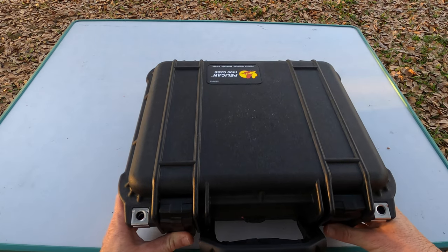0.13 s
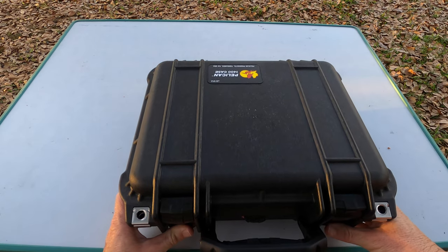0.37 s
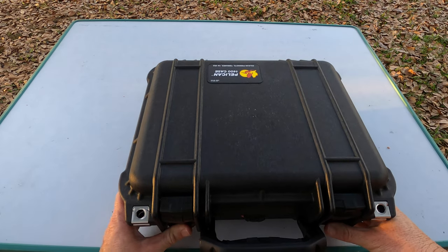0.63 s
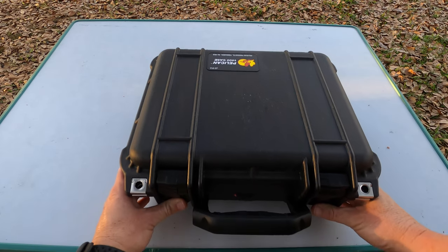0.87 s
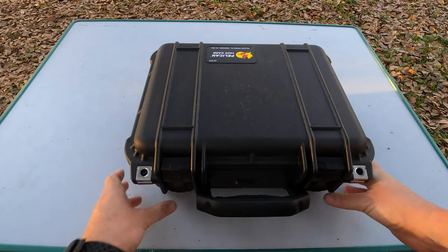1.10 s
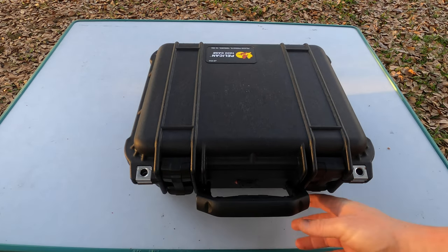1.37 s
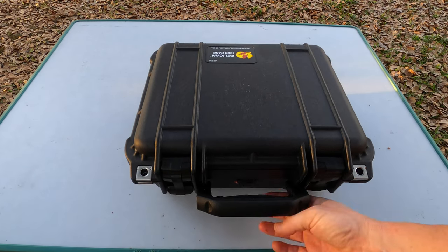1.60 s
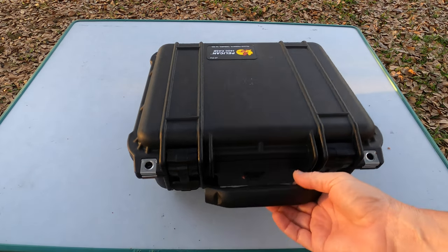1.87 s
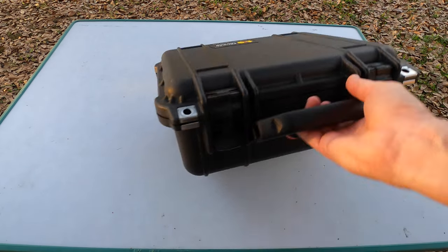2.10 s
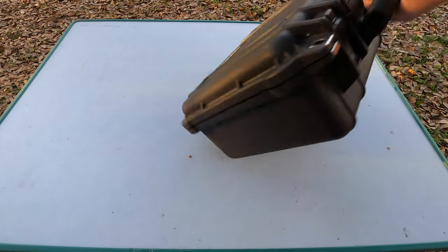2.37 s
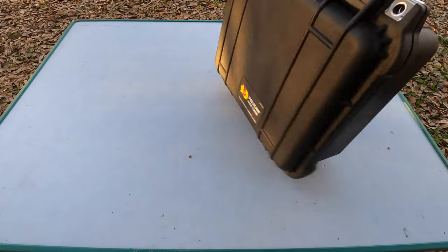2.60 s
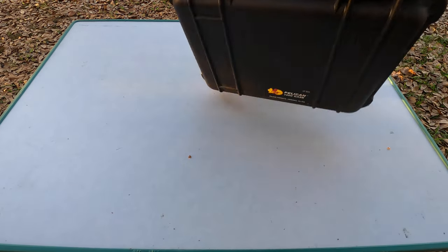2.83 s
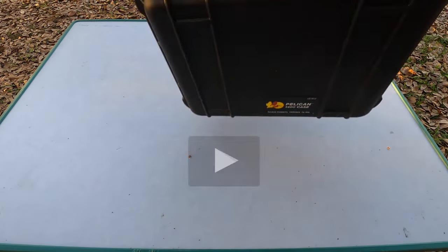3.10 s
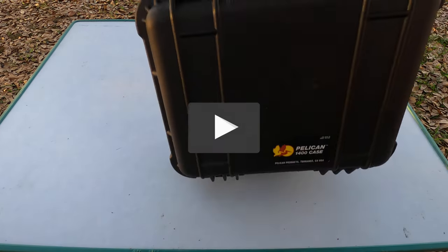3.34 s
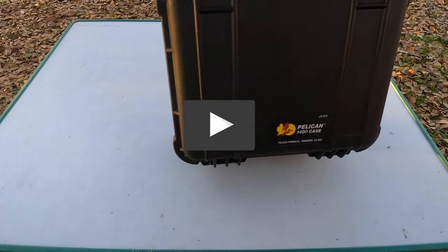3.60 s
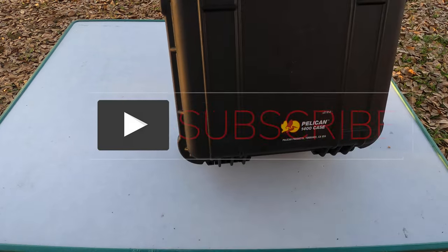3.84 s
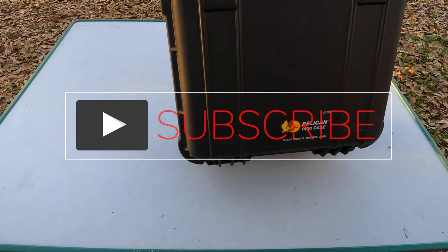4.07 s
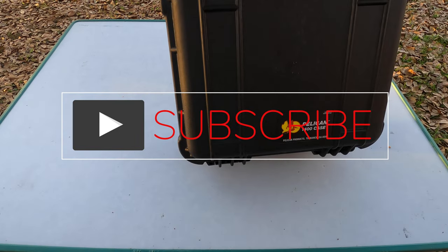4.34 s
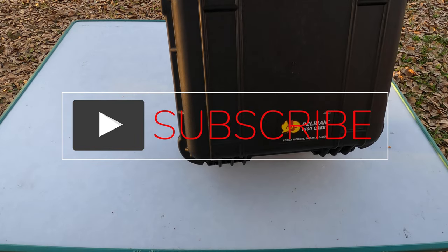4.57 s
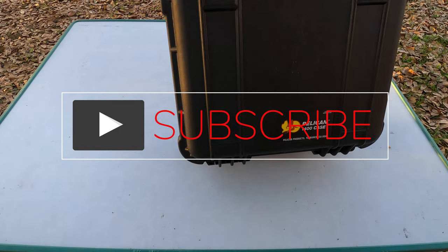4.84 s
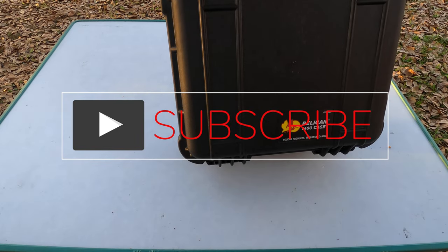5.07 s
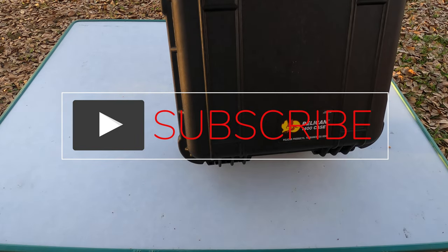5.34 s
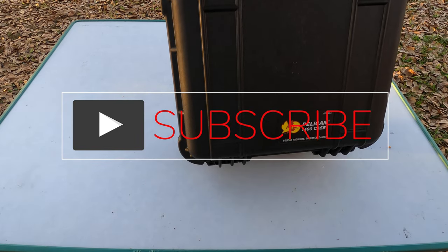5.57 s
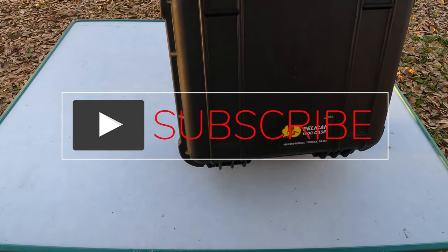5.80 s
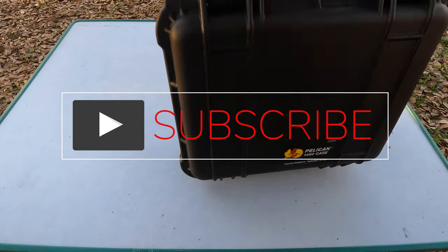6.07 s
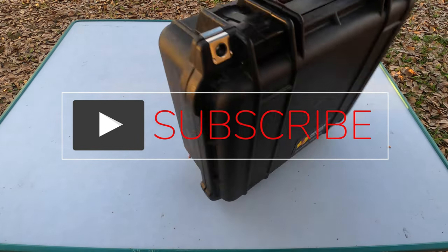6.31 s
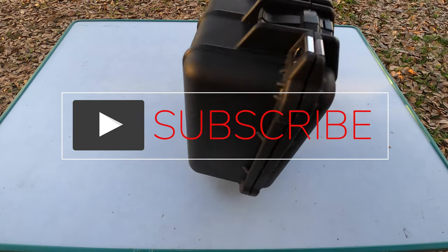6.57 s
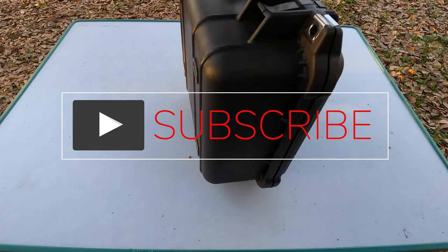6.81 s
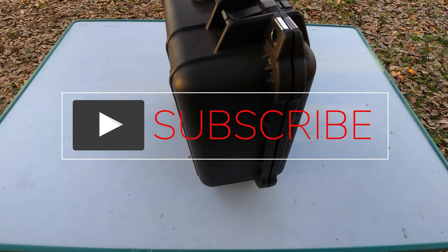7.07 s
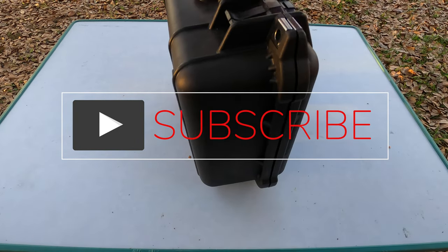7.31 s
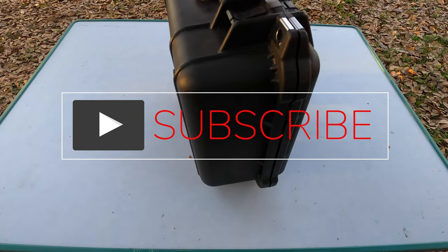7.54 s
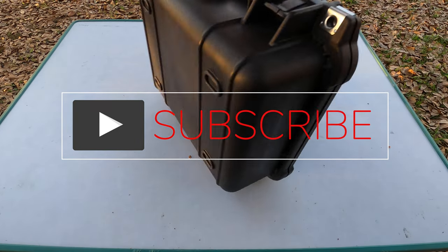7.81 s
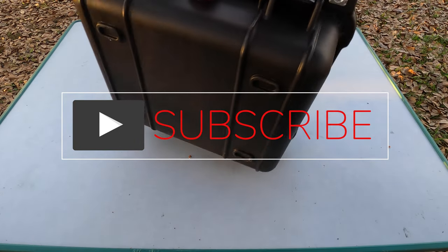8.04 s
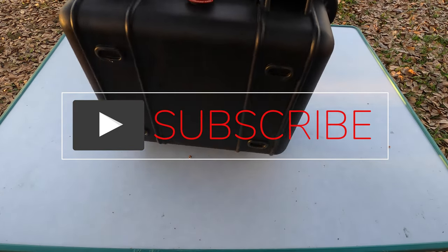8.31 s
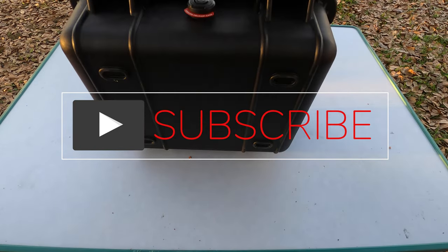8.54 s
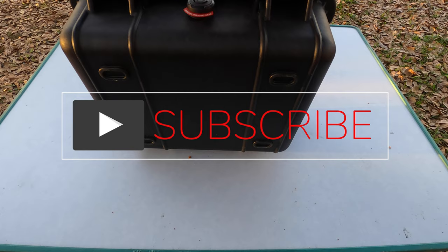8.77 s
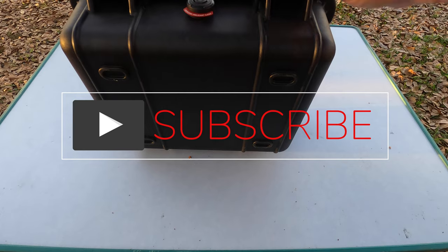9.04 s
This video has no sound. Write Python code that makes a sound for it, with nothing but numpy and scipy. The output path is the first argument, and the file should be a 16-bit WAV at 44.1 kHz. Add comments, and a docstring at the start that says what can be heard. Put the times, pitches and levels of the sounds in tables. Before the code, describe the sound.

Close stereo pickup outdoors. A steady low traffic hum with a wavering drone runs throughout, swelling gently near 2.5 and 6.5 seconds. Faint high cricket chirps recur from 1.2 seconds, several each second, stronger on the left, over a thin trill; tiny bird whistles appear occasionally. At 0.4 a latch ratchets briefly and snaps loudly with a small boom. A skin-on-plastic rub fills 0.8 to 1.2, ending with a light handle tap; a sharper clack comes at 1.55. Handle clacks and a knock follow around 2.35, a strong hollow knock at 2.77, then a cluster from 3.46 to 3.95. From 4 to 6.2 only the background remains. Short rubs and bumps resume, with a knock at 6.33 and duller thuds from 6.9 to 7.25. Brief bright scrapes near 7.8 to 8 lead to final knocks at 8.35 to 8.7, then softer low bumps until about 9.1.

```python
"""Plastic case on a folding table

A hard case is set down, slid, lifted and turned outdoors: contacts excite damped modes of shell and table.
A latch ratchets and snaps, a handle taps the shell (struck modes); hands and feet rub (filtered noise).
Behind: far traffic (coloured noise and a drone), crickets (pulsed tone, ringing noise),
small birds (gliding sines with diffuse echoes).
"""
import sys
import numpy as np
from scipy import signal
from scipy.fft import rfft, irfft, next_fast_len
from scipy.io import wavfile
from scipy.ndimage import uniform_filter1d

SR = 44100
rng = np.random.default_rng(int(sys.argv[2]) if len(sys.argv) > 2 else 0)


def invert_db(x):
    """Field ratio 10**(x/20) for x, a level in decibels (scalar or array-like)."""
    u = np.asarray(x, float) / 20
    return 10 ** u


def unload_audio(sound):
    """Save the sound as a 16-bit wav file, at the path given as the first command line argument."""
    columns = np.transpose(np.atleast_2d(sound))
    # keep every value between -1 and 1, then stretch to whole-number steps
    steps = np.round(np.clip(columns, -1, 1) * 32767)
    wavfile.write(sys.argv[1], SR, steps.astype(np.int16))


N = 403956

# far traffic spectrum before the hum: f/Hz, density/dB per Hz
FAR_COLOUR = [(12, -38), (20, -13.5), (58, -6), (145, -2), (222, -14), (299, -19), (351, -23), (496, -34),
              (871, -25.5), (1080, -28.5), (3900, -57), (6840, -54), (8940, -62.5), (9690, -84.5),
              (12000, -92), (15600, -119), (22000, -120)]
# hum resonances: f/Hz, width/Hz, lift/dB
HUM_RESONANCES = [(55, 10, 6.5), (136.84, 15, 9.5), (176, 5.4, 6.5), (220.9, 35, 8), (362, 20, 11.5)]
# left-right likeness of the traffic: f/Hz, likeness/1 (negative counts as 0)
FAR_LIKENESS = [(60, 1), (180, 1), (550, 0.92), (1650, 0.68), (4970, 0.14), (15000, -0.11)]
# traffic, left over right: f/Hz, level/dB
FAR_LEFT_RIGHT = [(60, 2), (180, 1), (550, 4), (1650, 3), (4970, 3), (15000, -2)]
# traffic, lag of the left port: f/Hz, phase/rad
FAR_LEFT_LAG = [(50, .05), (700, 0.39), (2150, 1.1), (4500, 1.1), (9000, 3.5)]
# overall background level: t/s, level/dB
BACKGROUND_LEVEL = [(0, -5.5), (.8, -7.5), (1.5, 0), (2.1, 2.5), (2.5, 5), (2.9, -0.5), (3.2, 0.5),
                    (3.8, -1.5), (4.2, -1.5), (4.64, 0.5), (5.1, 0), (5.5, 0.5), (5.87, 2), (6.45, 2.5),
                    (6.8, 1), (7.3, 1), (8.3, -0.5), (9.16, 0.5)]
# traffic registers: from f/Hz, to f/Hz, level/dB, share of the background level/1
TRAFFIC_REGISTERS = [(0, 95, -40, 1.1), (102.6, 420, -39, 0.71), (415, 22050, -54.5, 1.1)]
# cricket chirps: start t/s, first to last pulse/s, level/dB
CRICKET_CHIRPS = [(1.229, 0, -62), (1.452, .05, -64), (1.739, .05, -63.5), (2.004, .05, -59),
                  (2.594, 0, -56), (2.816, .05, -60), (3.078, .05, -61), (3.341, .05, -58),
                  (3.682, 0, -60.5), (3.948, .05, -61.5), (4.226, .05, -58), (4.486, .1, -58),
                  (4.856, .05, -60.5), (5.148, .05, -58), (5.45, .05, -56), (5.747, .05, -56.5),
                  (6.048, .05, -57), (6.368, .05, -61), (6.646, .05, -58.5), (6.971, 0, -56.5),
                  (7.21, .05, -60), (7.492, .05, -59), (7.78, .05, -58), (8.081, .1, -55.5)]
# cricket trill: t/s, level/dB
TRILL_LEVEL = [(0, -82), (1.2, -79), (4, -81.5), (6.3, -77.5), (7.2, -79), (9.16, -90.5)]
# arched bird calls: start t/s, length/s, top f/Hz, level/dB
ARCHED_CALLS = [(1.39, .1, 8240, -70), (5.05, .1, 8140, -72), (6.545, .09, 8360, -68),
                (7.12, .09, 8270, -77), (7.26, .1, 8000, -72), (7.59, .125, 8200, -71),
                (8.07, .2, 8950, -79), (8.15, .125, 8200, -69), (8.335, .11, 8180, -70),
                (8.86, .08, 8140, -73)]
# arched call shape: share of length/1, f over top f/1, level/dB
ARCH_SHAPE = [(0, .95, -9), (.3, 1, -2), (.45, .985, -1), (.75, .92, 0), (1, .89, -6)]
# falling bird notes: start t/s, length/s, first f/Hz, level/dB
FALLING_CALLS = [(1.842, .035, 4700, -62), (7.712, .04, 4600, -64)]
# falling note shape: share of length/1, f over first f/1, level/dB
FALL_SHAPE = [(0, 1, -4), (.4, .93, 0), (1, .8, -8)]
# hand and foot slides: start t/s, length/s, rub level/dB, drag over rub/dB, sizzle over rub/dB
RUB_SLIDES = [(-.1, 0.28, -64.5, -6, -7.5), (.405, 0.3, -63.5, -3.5, -5.5), (0.727, 0.069, -73, -2, -15),
              (0.79, 0.39, -40, -11.5, -22.5), (1.162, 0.013, -52, -5, -28), (1.19, .12, -78, -10, -8),
              (1.557, 0.088, -58.5, 0, -14), (1.74, 0.2, -68, -14, -4), (1.929, 0.053, -52, -3, -27),
              (2.09, 0.72, -52.5, -4, -9.5), (2.32, .26, -71, -2, -4), (2.632, 0.22, -58, 6, -9.5),
              (3.236, 0.24, -73, -7, -3), (3.458, 0.11, -61, -5, -10), (3.596, 0.05, -60.5, -0.5, -34),
              (3.714, 0.11, -64, 6.5, -22), (6.182, 0.025, -63.5, -18, -2.5),
              (6.237, .035, -60.5, 7.5, -12), (6.333, 0.027, -63, 14.5, -5),
              (6.437, 0.04, -52.5, -1.5, -15.5), (6.53, 0.031, -56.5, -0.5, -17),
              (6.606, 0.04, -55.5, 2, -13), (6.674, 0.058, -55.5, 0.5, -4.5),
              (6.738, 0.089, -51.5, -1.5, -21), (6.909, 0.067, -55.5, 4.5, -17),
              (7.503, 0.066, -66.5, 9.5, -4.5), (7.617, .12, -72.5, -5, -5), (7.778, 0.075, -52, 0, -1),
              (7.87, 0.077, -56, 6, -8), (7.957, 0.068, -52.5, 1.5, 0), (8.333, 0.13, -60, 1.5, -19.5),
              (8.42, .15, -52, 0.5, -19), (8.607, 0.062, -74, 7, -9.5)]
# loss at both ends of a full slide, where it is slowest: drag/dB, rub/dB, sizzle/dB
END_LOSS_DB = [8, 12, 15]
# low drag spectrum: f/Hz, density/dB per Hz
DRAG_COLOUR = [(500, -33), (900, 3), (1400, 8.5), (2000, 0), (3000, -44)]
# shell rub spectrum: f/Hz, density/dB per Hz
RUB_COLOUR = [(1200, -41.5), (2000, -4), (2420, -6), (2900, 1.5), (3850, -3.5), (4500, -8.5), (6500, -16.5),
              (9000, -24.5), (12000, -47.5)]
# bright sizzle spectrum: f/Hz, density/dB per Hz
SIZZLE_COLOUR = [(3500, -24), (5000, 1.5), (6500, -1.5), (8300, -8.5), (11000, -14), (13000, -22.5),
                 (16000, -50)]
# shell bands that sing under a rub: f/Hz, level/dB, t60/s
SINGING_BANDS = [(934, -17.5, 0.086), (1530, -18.5, .03), (2387, -9.5, 0.018), (2930, -16.5, 0.032),
                 (3900, -16, 0.0061), (5000, -21, 0.015)]
# latch modes: f/Hz, level/dB, t60/s
LATCH_MODES = [(620, -17, .02), (950, -10.5, .014), (1350, -3.5, 0.0072), (1920, -1, .007),
               (2500, -4.5, 0.0045), (3400, -4, 0.0039), (4700, -6.5, 0.0039), (6600, -12.5, .004),
               (9200, -14.5, .004), (12500, -23.5, .003)]
# boom of the closed lid: f/Hz, level/dB, t60/s
LID_MODES = [(143, -15, .13), (191, -21.5, 0.35), (262, -20, .13), (410, -22, .06)]
# folding handle on the shell: t/s, level/dB
TAPS = [(1.1679, -27.5), (1.5445, -39), (1.5548, -15), (2.3642, -10.5), (2.4088, -26), (2.4242, -35)]
# handle modes: f/Hz, level/dB, t60/s
HANDLE_MODES = [(957, 2.5, 0.023), (1370, -1, 0.014), (1660, 0, 0.012), (2180, -0.5, 0.01),
                (2860, -11.5, 0.0098), (3700, -5, 0.0079), (5100, -25, .008), (6640, -25, 0.01),
                (9280, -22, 0.0038)]
# contacts: t/s, push on table/dB, knock on shell/dB, hardness/dB per octave above shell pitch
CONTACTS = [(1.1542, -48.5, -37, -7), (1.6173, -51, -47.5, -6), (1.9563, -36.5, -60, 8.5),
            (2.128, -38, -33, -1), (2.335, -17.5, -25.5, -8.5), (2.4246, -32.5, -49, -5),
            (2.4671, -31.5, -32.5, -7.5), (2.7035, -30, -36, -7), (2.7348, -22, -33, -8),
            (2.771, -10, -18.5, -2), (3.46, -37.5, -38.5, -10), (3.471, -10, -17, -4.5),
            (3.5222, -28.5, -45.5, 2), (3.5971, -14, -19, -10.5), (3.6768, -26.5, -33.5, -12),
            (3.7241, -18.5, -24, -10), (3.797, -24, -26, -5.5), (3.9553, -34.5, -43.5, -13),
            (6.1882, -51, -60, 6.5), (6.3265, -20.5, -20.5, -6.5), (6.4404, -23, -46.5, 6),
            (6.516, -33.5, -35.5, -8), (6.6018, -49.5, -52, 1), (6.6731, -48.5, -52, 0),
            (6.7623, -54, -50, 5), (6.9179, -14, -17.5, -11.5), (6.989, -16.5, -25, -8),
            (7.1172, -18, -18.5, -14), (7.228, -25, -28, -32), (7.268, -47, -51, -16),
            (7.2896, -34.5, -44.5, -24), (7.352, -68, -49.5, -12.5), (7.4062, -58, -46.5, -11),
            (7.4391, -37, -44, -18), (7.488, -58, -48, -5), (7.7806, -28.5, -44, -11),
            (8.354, -19, -43, -2.5), (8.4697, -14, -18, -4), (8.4907, -39, -30.5, -14),
            (8.5108, -43.5, -42, 2.5), (8.5734, -45.5, -49.5, 1.5), (8.6272, -20, -24, -16.5),
            (8.6953, -24, -34.5, -20.5), (8.7231, -53, -49.5, -6.5), (8.873, -28.5, -41, -23),
            (8.888, -48, -47, -2), (8.9617, -36.5, -41, -34), (9.0942, -31, -50, -12)]
# case and table-top modes: f/Hz, level/dB, t60/s
BODY_MODES = [(39.3, -8, 0.16), (63.4, -7.5, 0.28), (81, -4.5, 0.084), (111.8, 4.5, 0.13), (138.8, 0, 0.2),
              (172, 2.5, 0.15), (206.3, -5.5, 0.25), (259, -8, 0.16), (331.4, -6, 0.14),
              (397.6, -7.5, 0.14), (474.4, -6.5, 0.083), (629, -6.5, 0.061), (758, -7, 0.042),
              (960, 1.5, 0.024), (1123, 4, 0.02), (1285, 0, 0.023), (1477, 5, 0.013), (1732, 3.5, 0.012),
              (2007, 4, 0.0091), (2630, 3.5, 0.0065), (3230, -1.5, 0.011), (3810, -2.5, 0.0023),
              (4620, 1, 0.0061), (6150, -4, 0.0063), (7670, -8.5, 0.0008), (8900, -7, 0.004),
              (11350, -18.5, 0.0017), (14970, -15.5, 0.0017)]
# case, lag of the left port: f/Hz, phase/rad
NEAR_LEFT_LAG = [(50, .17), (200, .2), (350, .27), (700, .44), (1400, .57), (2800, .76), (5500, 1.1),
                 (9000, 1.45), (15000, 2.3)]
# case, left over right: f/Hz, level/dB
NEAR_LEFT_RIGHT = [(60, .7), (180, .7), (350, -.2), (700, -.4), (1400, -.9), (2800, 1.1), (5500, -.3),
                   (10000, -2.5), (14000, -.5)]


def rms_one(x):
    """Scale to unit rms."""
    return x / np.sqrt(np.mean(x ** 2) + 1e-20)


def at_hz(points, hz):
    """Read a (f/Hz, value) table on a log axis."""
    points = np.array(points)
    return np.interp(np.log(hz + 1), np.log(points[:, 0]), points[:, 1])


def drift(rate_hz):
    """Random wander of unit rms: noise through two equal poles at rate_hz."""
    step = 40  # samples per drawn point
    r = np.exp(-2 * np.pi * step * rate_hz / SR)
    noise = rng.standard_normal(N // step + 2002)
    slow = signal.lfilter([1], [1, -2 * r, r * r], noise)[2000:]  # settled part
    return np.interp(np.arange(N) / step, np.arange(len(slow)), rms_one(slow))


def ring(x, hz, t60_s, soft=0.):
    """Damped resonator: a unit click starts a wave of height 1; soft rounds the start."""
    r, w = invert_db(-60 / (t60_s * SR)), 2 * np.pi * hz / SR
    poles = np.convolve([1, -2 * r * np.cos(w), r * r], [1, -2 * soft, soft ** 2])
    return signal.lfilter(np.array([.5, 0, -.5]) * (1 - soft) ** 2, poles, x + 1e-18)


def decaying(clicks, fade_s):
    """Each click starts an exponential decay to 1/e in fade_s."""
    return signal.lfilter([1], [1, -np.exp(-1 / (SR * fade_s))], clicks + 1e-18)


def shaped(x, gain):
    """Filter by a gain given as a function of f/Hz."""
    size = next_fast_len(N)
    hz = np.arange(size // 2 + 1) * SR / size
    return irfft(rfft(x, size) * gain(hz), size)[..., :N]


def ports(lag, balance):
    """Two microphone ports: sound reaches the right one first; levels differ with frequency."""
    def gain(hz):
        level = invert_db(np.outer([.5, -.5], at_hz(balance, hz)))
        return level * np.exp(-.5j * np.outer([1, -1], at_hz(lag, hz)))
    return gain


def scatter(x, t60_s=.25):
    """Diffuse echoes off ground and trees: decaying noise, unlike in the two ports."""
    t = np.arange(SR // 3) / SR
    echoes = rng.standard_normal((2, len(t))) * invert_db(-60 * t / t60_s) * (t > .01)
    return signal.fftconvolve(x[None], echoes / np.sqrt(np.sum(echoes ** 2) / 2), axes=1)[:, :N]


def traffic(patchy_db=1.5, drone_hz=138.1, drone_db=-39.5, top_hz=9000):
    """Far traffic: noise registers follow the overall background level together with a wavering drone; treble
    differs between ports."""
    size = next_fast_len(N)
    hz = np.arange(size // 2 + 1) * SR / size
    hum_db = sum(db / (1 + (2 * (hz - centre) / width) ** 2) for centre, width, db in HUM_RESONANCES)
    roll_off_db = 20 * np.log10(1 + (hz / top_hz) ** 24)
    colour = invert_db(at_hz(FAR_COLOUR, hz) + hum_db - roll_off_db) * ports(FAR_LEFT_LAG, FAR_LEFT_RIGHT)(hz)
    mid, side = rfft(rng.standard_normal((2, size)))
    alike = np.clip(at_hz(FAR_LIKENESS, hz), 0, 1)
    pair = colour * (np.sqrt(1 + alike) * mid + np.sqrt(1 - alike) * side * [[1], [-1]])
    background_db = np.interp(np.arange(N) / SR, *np.transpose(BACKGROUND_LEVEL))
    out = 0
    for low_hz, high_hz, level_db, share in TRAFFIC_REGISTERS:
        band = irfft(pair * (hz >= low_hz) * (hz < high_hz), size)[:, :N]
        out = out + invert_db(level_db + share * background_db + patchy_db * drift(8.4)) * rms_one(band)
    drone = np.sin(2 * np.pi * drone_hz * np.cumsum(1 + 0.01498 * drift(3)) / SR)
    return out + invert_db(background_db + drone_db + 1.5 * drift(7.8) + [[.7], [-.7]]) * drone


def chirping(chirp_hz=5980, pulse_sigma_s=0.0093, gap_s=0.048, first_pulse_db=-1.5):
    """Cricket chirps: bell-shaped pulses of a wavering tone; the wing warms up on the first stroke."""
    marks = np.zeros(N)
    for start_s, length_s, db in CRICKET_CHIRPS:
        k = np.arange(round(length_s / gap_s) + 1)
        at = np.round((start_s + k * gap_s) * SR).astype(int)
        marks[at] = invert_db(db + first_pulse_db * (k == 0))
    bell = np.exp(-.5 * (np.arange(-1500, 1501) / SR / pulse_sigma_s) ** 2)
    tone = np.sin(2 * np.pi * chirp_hz * np.cumsum(1 + 0.0026 * drift(30)) / SR)
    return signal.fftconvolve(marks, bell, "same") * invert_db(3.6 * drift(150)) * tone


def trilling(trill_hz=6970, beats_per_s=57.0):
    """Steady cricket trill: ringing noise under a regular beat."""
    t = np.arange(N) / SR
    beat = (.5 + .5 * np.cos(2 * np.pi * beats_per_s * t + .5 * drift(2))) ** 1.5
    trill = rms_one(beat * ring(rng.standard_normal((2, N)), trill_hz, 0.036))
    return trill * invert_db(np.interp(t, *np.transpose(TRILL_LEVEL)) + 0.77 * drift(1.7))


def crickets(echo_db=-12, high_hz=8750, high_db=-90):
    """Chirps on the left with echoes, a trill slightly left, and a higher chorus hiss of ringing noise."""
    chirp = chirping()
    high = rms_one(ring(rng.standard_normal((2, N)), high_hz, 0.0073)) * invert_db(high_db)
    direct = chirp * invert_db([[3.5], [-8]])
    return direct + invert_db(echo_db) * scatter(chirp) + trilling() * invert_db([[1.5], [-1.5]]) + high


def birds(echo_db=-3, fade_s=0.013):
    """Thin gliding whistles with echoes; each kind of call has one shape."""
    out = np.zeros(N)
    for calls, shape in ((ARCHED_CALLS, ARCH_SHAPE), (FALLING_CALLS, FALL_SHAPE)):
        share, ratio, shape_db = np.transpose(shape)
        for start_s, length_s, pitch_hz, level_db in calls:
            u, at = np.linspace(0, 1, round(length_s * SR)), round(start_s * SR)
            fade = np.clip(np.minimum(u, 1 - u) * length_s / fade_s, 0, 1)
            glide_hz = pitch_hz * uniform_filter1d(np.interp(u, share, ratio), size=400, mode="nearest")
            whistle = np.sin(2 * np.pi * np.cumsum(glide_hz) / SR)
            out[at:at + len(u)] += fade * invert_db(level_db + np.interp(u, share, shape_db)) * whistle
    out = out * invert_db(2.2 * drift(90))
    return out * invert_db([[1.0], [-1.0]]) + invert_db(echo_db) * scatter(out)


def slide_levels(grip_s=.004, let_go_s=.005, linger_s=.05, linger_db=-19.5, full_swing_s=.3):
    """Gains of drag, rub and sizzle: skin grips, slows at both ends, creeps on faintly after letting go."""
    t, levels = np.arange(N) / SR, np.zeros((3, N))
    for start_s, length_s, rub_db, drag_db, sizzle_db in RUB_SLIDES:
        part = slice(max(int((start_s - .1) * SR), 0), int((start_s + length_s + .3) * SR))
        u = t[part] - start_s
        touch = np.exp(np.minimum(0, np.minimum(u / grip_s, (length_s - u) / let_go_s)))
        creep = np.exp(np.minimum(0, np.minimum(u / grip_s, (length_s - u) / linger_s)))
        # shorter slides keep more of their speed to the ends
        slowing = np.clip(2 * u / length_s - 1, -1, 1) ** 2 * min(length_s / full_swing_s, 1)
        level_db = rub_db + np.array([[drag_db], [0], [sizzle_db]]) - np.outer(END_LOSS_DB, slowing)
        levels[:, part] += (touch + invert_db(linger_db) * creep) * invert_db(level_db)
    return levels


def rubbing(grain_db=2.5, flutter_db=1.8, wander_db=3.5):
    """Dense slips of skin and plastic: low drag, shell rub with singing bands, bright sizzle."""
    levels = slide_levels()
    grain = np.minimum(rng.exponential(1, N), 5)
    slips = rng.standard_normal((3, N)) * invert_db(grain_db * grain + flutter_db * drift(37))
    drag, rub, sizzle = (rms_one(shaped(x, lambda hz: invert_db(at_hz(colour, hz))))
                         for x, colour in zip(slips, (DRAG_COLOUR, RUB_COLOUR, SIZZLE_COLOUR)))
    for hz, db, t60_s in SINGING_BANDS:
        rub = rub + invert_db(db + wander_db * drift(3.8)) * rms_one(ring(slips[0], hz, t60_s))
    return levels[0] * drag + levels[1] * rub + levels[2] * sizzle


def struck(hits, modes, contact_s, spread_db=3.5, chatter=1.0):
    """Each hit (t/s, level/dB) is a click with brief noise chatter; it rings a table of modes."""
    out, t = np.zeros(N), np.arange(SR // 2) / SR
    for hit_s, db in hits:
        force = rng.standard_normal(len(t)) * np.exp(-t / contact_s)
        force = chatter * force / np.sqrt(np.sum(force ** 2)) + (t == 0)
        at, luck = round(hit_s * SR), rng.standard_normal(len(modes))
        for k, (hz, level_db, t60_s) in enumerate(modes):
            gain = (-1) ** k * invert_db(db + level_db + spread_db * luck[k])
            out[at:at + len(t)] += gain * ring(force, hz, t60_s, np.exp(-3.6 * np.pi * hz / SR))
    return out


def handle():
    """The folding handle taps the shell and rings its modes."""
    return struck(TAPS, HANDLE_MODES, contact_s=.0012)


def latch(snap_at_s=.4001, snap_db=2, contact_s=0.0014, teeth=4, gap_s=.0103, last_tooth_db=-15.5,
          tooth_step_db=-12.5):
    """The latch ratchets over its teeth, each louder, then snaps shut; the closed lid booms."""
    snap = [(snap_at_s, snap_db)]
    # counted back from the snap
    ratchet = [(snap_at_s - gap_s * (k + 1), snap_db + last_tooth_db + tooth_step_db * k)
               for k in range(teeth)]
    clatter = struck(ratchet + snap, LATCH_MODES, contact_s, chatter=1.3)
    return clatter + struck(snap, LID_MODES, contact_s, chatter=0)


def knocks(chatter_s=0.00099, shudder_cycles=5.9, spread_db=3.0, tail_s=0.015, tail_db=-9,
           hollow_s=0.058, hollow_tail_db=-4):
    """Contacts click and shudder, longer for lower modes; contents and hollow shell rattle after."""
    table_hz, hollow_hz, shell_hz = 110, 450, 1250  # push and knock act at the ends, a blend between
    bend_db = 1.5  # per octave squared: even hard contacts dull at the very top
    contact_s, push_db, knock_db, hardness = np.transpose(CONTACTS)
    hollow_force_db = (push_db + knock_db) / 2 - 1.5
    at, out = np.round(contact_s * SR).astype(int), np.zeros(N)
    luck = rng.standard_normal((len(at), len(BODY_MODES)))
    noise = rng.standard_normal(N)
    for k, (hz, level_db, t60_s) in enumerate(BODY_MODES):
        pitches = np.log([table_hz, hollow_hz, shell_hz])
        share = [np.interp(np.log(hz), pitches, row) for row in np.eye(3)]
        octaves = max(np.log2(hz / shell_hz), 0)
        force_db = np.dot(share, [push_db, hollow_force_db, knock_db])
        force_db = force_db + octaves * (hardness - bend_db * octaves)
        # the table top always gives way first; neighbouring shell modes move in opposition
        phase = -1 if hz < 300 else (-1) ** k
        clicks = np.zeros(N)
        clicks[at] = phase * invert_db(force_db + level_db + spread_db * luck[:, k])
        shudder_s = chatter_s + shudder_cycles / hz
        r = np.exp(-1 / (SR * shudder_s))
        shudder = np.sqrt(1 - r * r) * decaying(clicks, shudder_s) * noise
        soft = np.exp(-2 * np.pi * 2.105 * hz / SR)  # finite contact: no mode starts with a corner
        click_gain, shudder_gain = (.9, .8) if hz < 300 else (1.7, .55)
        out += ring(click_gain * clicks + shudder_gain * shudder, hz, t60_s, soft)
    for level_db, fade_s, band_hz in ((knock_db + tail_db, tail_s, [700, 1800]),
                                      (hollow_force_db + hollow_tail_db, hollow_s, [200, 700])):
        clicks = np.zeros(N)
        clicks[at] = invert_db(level_db)
        rattle = decaying(clicks, fade_s) * rng.standard_normal(N)
        out += signal.sosfilt(signal.butter(2, band_hz, "band", fs=SR, output="sos"), rattle)
    return out


def scene():
    """Case close in front; surroundings mostly louder on the left."""
    case = knocks() + latch() + handle() + rubbing()
    near = shaped(case, ports(NEAR_LEFT_LAG, NEAR_LEFT_RIGHT))
    return near + traffic() + crickets() + birds()


def roll_off(x):
    """The treble ends steeply here."""
    return signal.sosfilt(signal.butter(12, 21850, fs=SR, output="sos"), x)


def record(dry):
    """Peaks clip at full scale; a low-pass rolls off the top."""
    top = signal.butter(4, 15500, fs=SR, output="sos")
    mix = np.clip(signal.sosfilt(top, np.clip(dry, -1, 1)), -1, 1)
    return roll_off(mix)


dry = scene()
out = record(dry)
unload_audio(out)
```